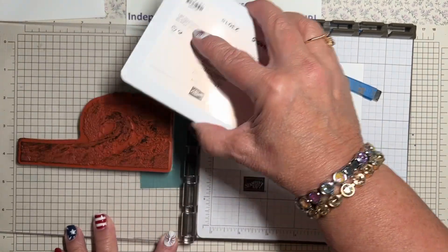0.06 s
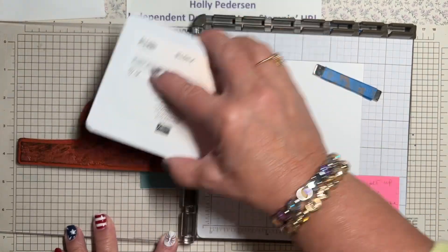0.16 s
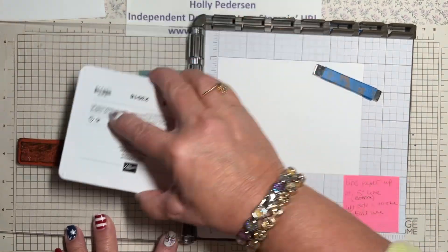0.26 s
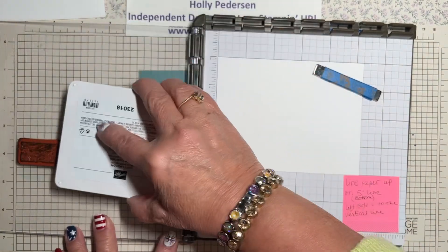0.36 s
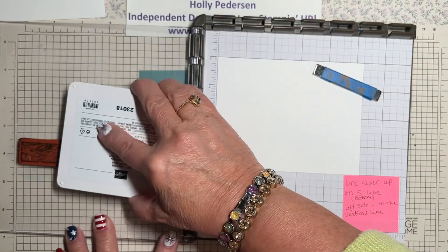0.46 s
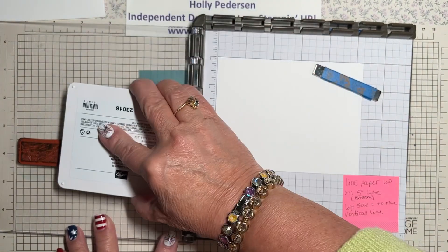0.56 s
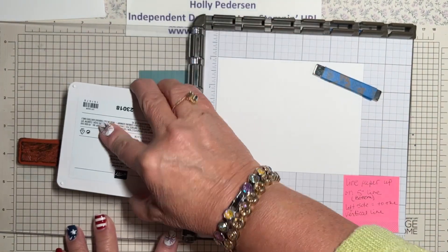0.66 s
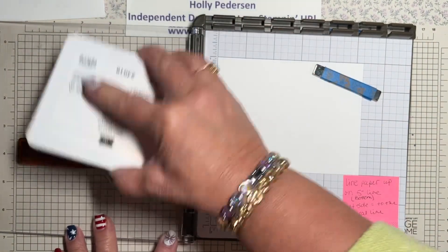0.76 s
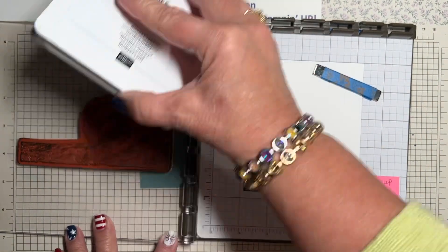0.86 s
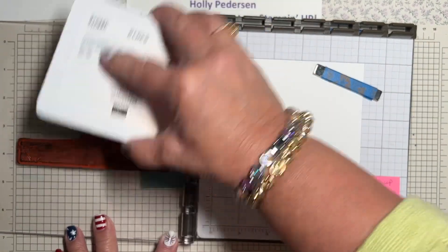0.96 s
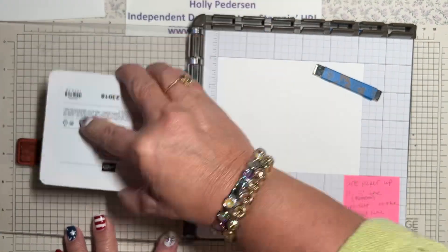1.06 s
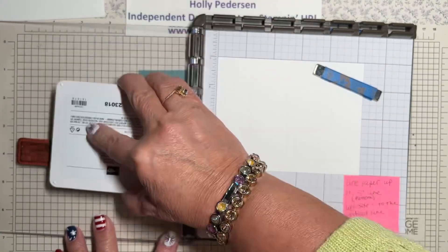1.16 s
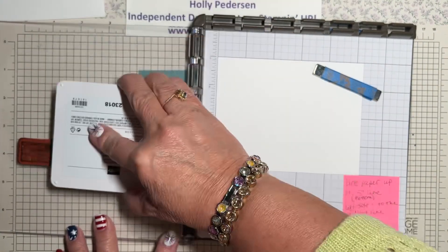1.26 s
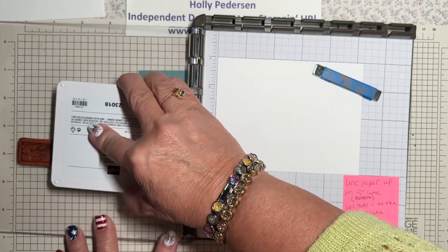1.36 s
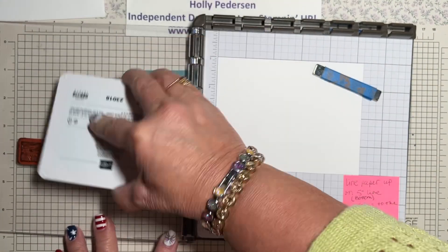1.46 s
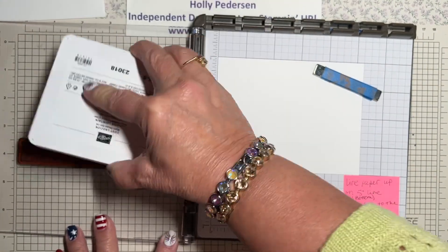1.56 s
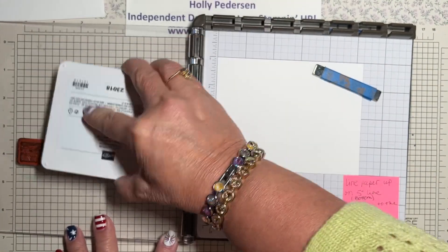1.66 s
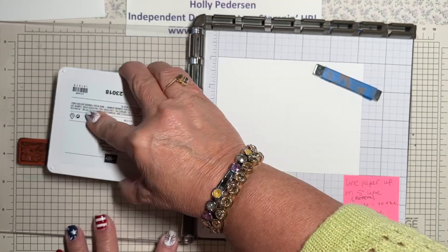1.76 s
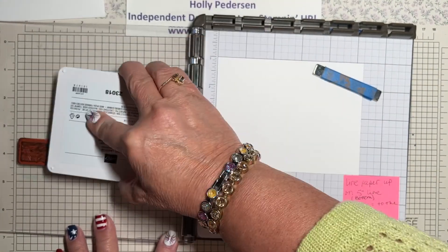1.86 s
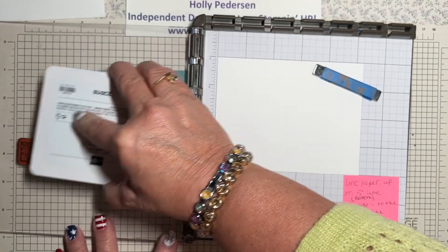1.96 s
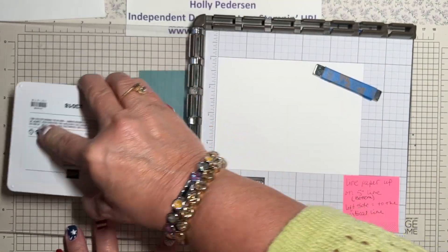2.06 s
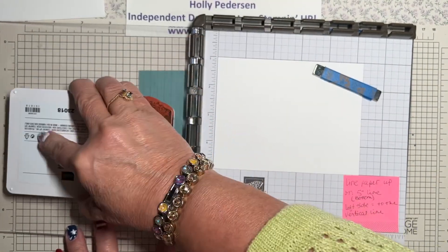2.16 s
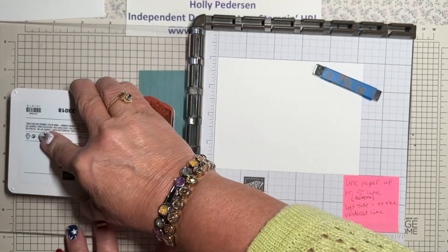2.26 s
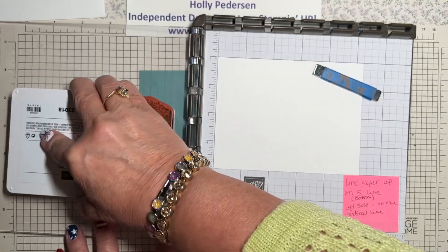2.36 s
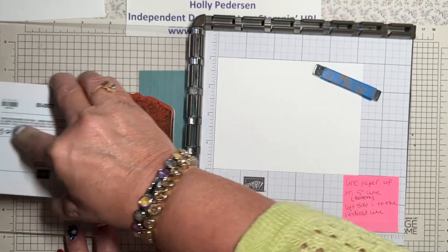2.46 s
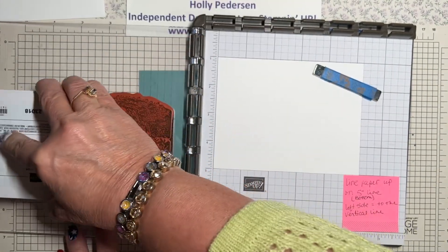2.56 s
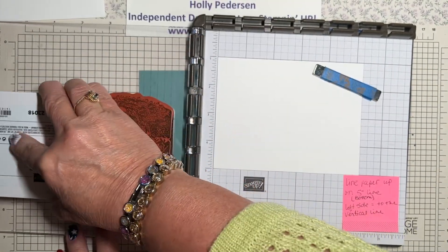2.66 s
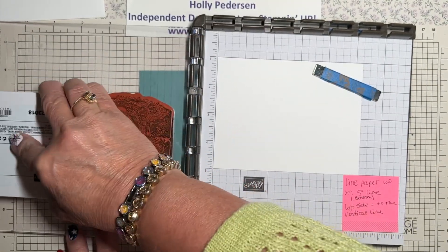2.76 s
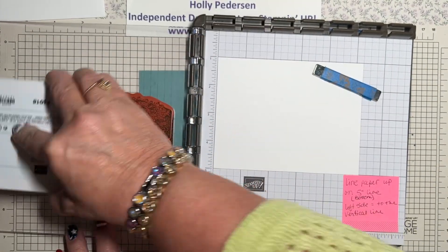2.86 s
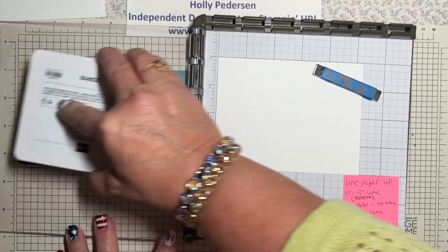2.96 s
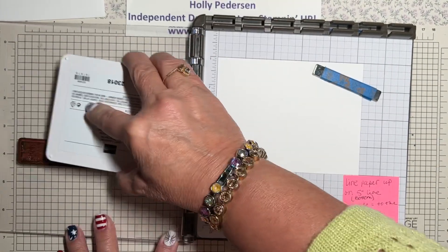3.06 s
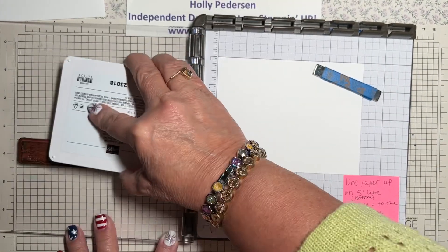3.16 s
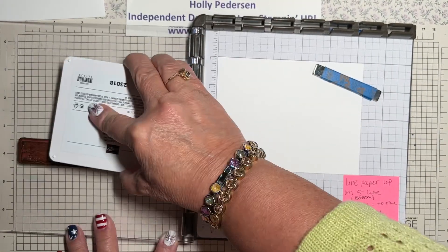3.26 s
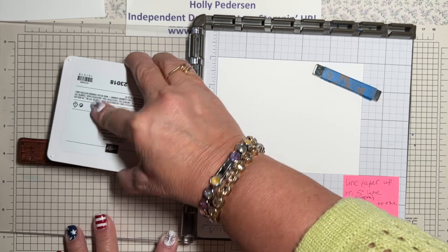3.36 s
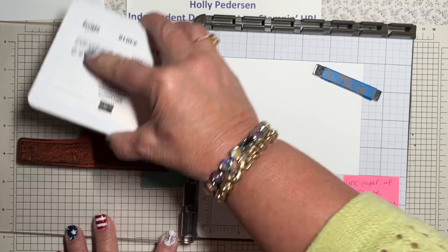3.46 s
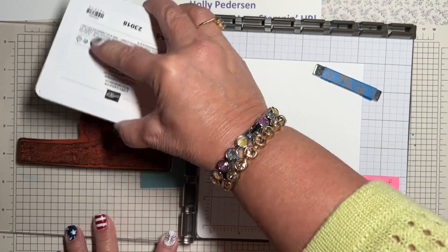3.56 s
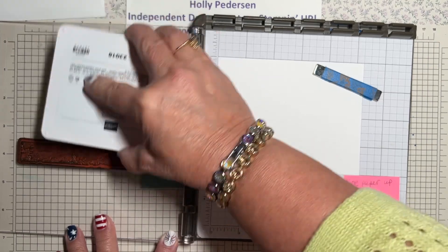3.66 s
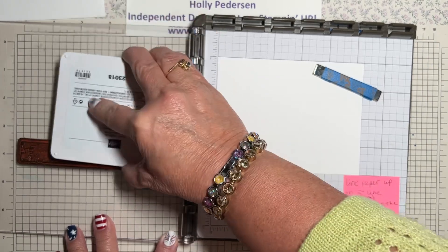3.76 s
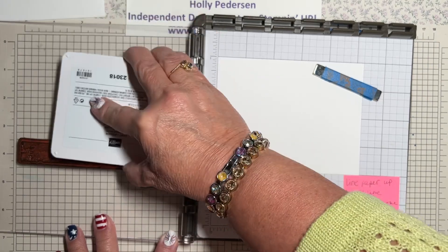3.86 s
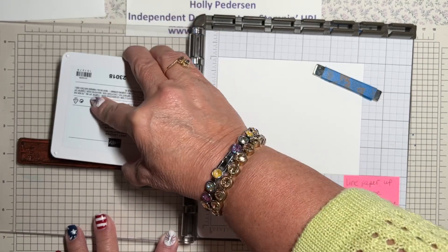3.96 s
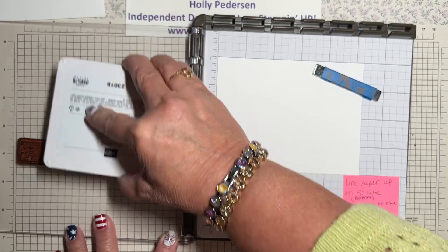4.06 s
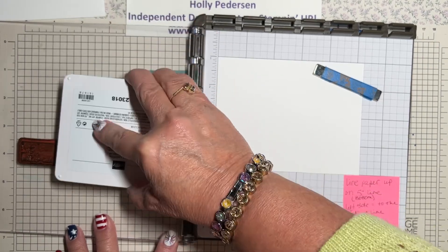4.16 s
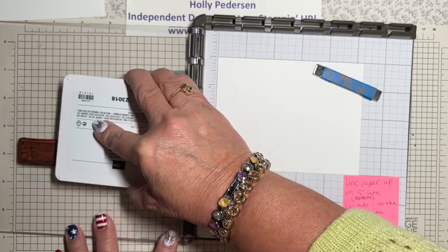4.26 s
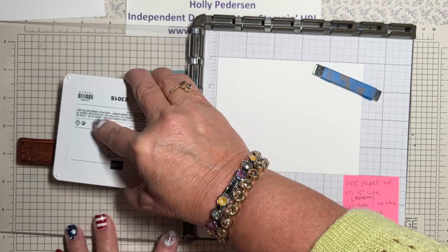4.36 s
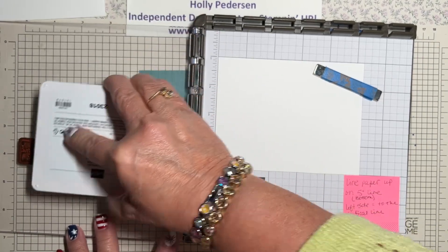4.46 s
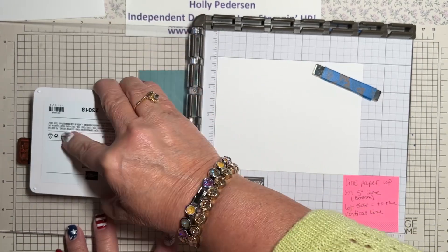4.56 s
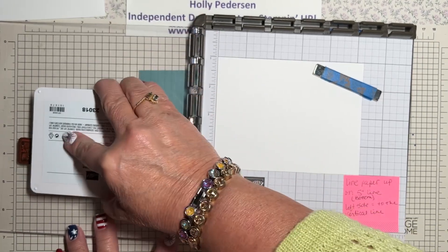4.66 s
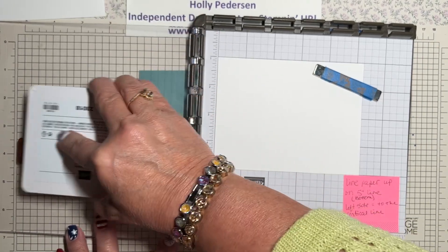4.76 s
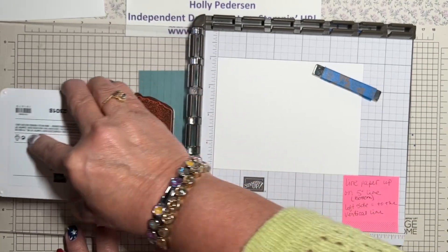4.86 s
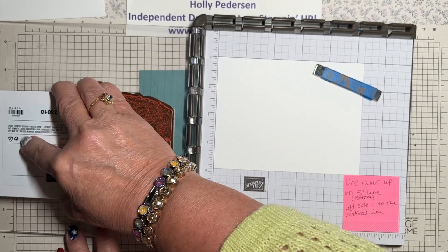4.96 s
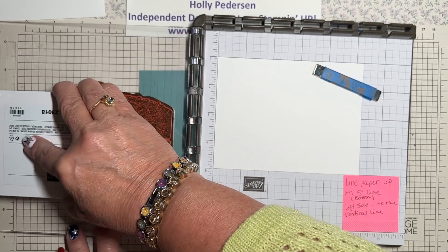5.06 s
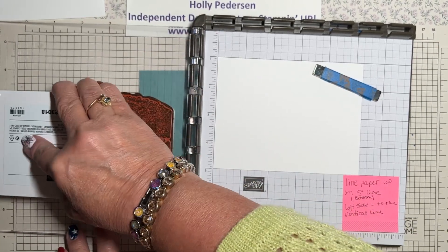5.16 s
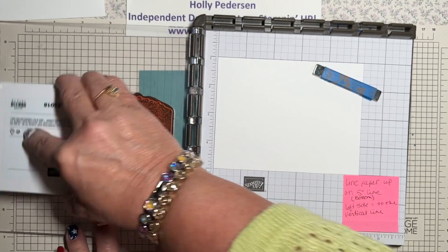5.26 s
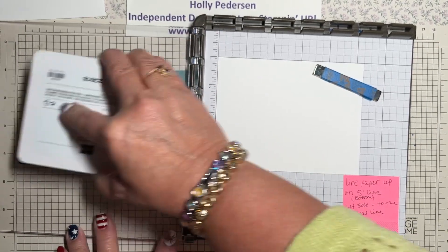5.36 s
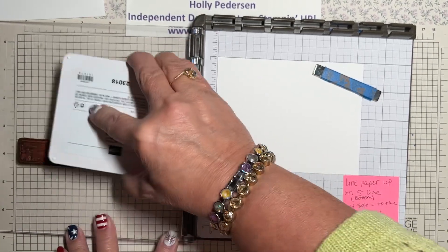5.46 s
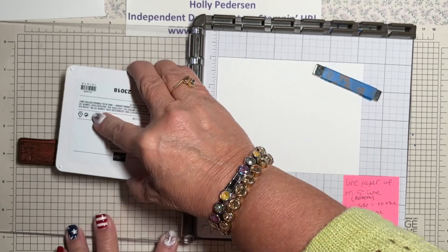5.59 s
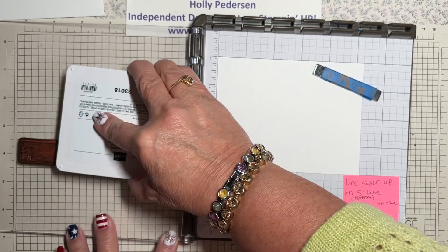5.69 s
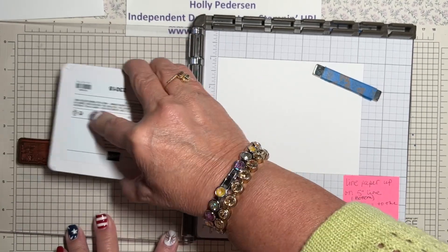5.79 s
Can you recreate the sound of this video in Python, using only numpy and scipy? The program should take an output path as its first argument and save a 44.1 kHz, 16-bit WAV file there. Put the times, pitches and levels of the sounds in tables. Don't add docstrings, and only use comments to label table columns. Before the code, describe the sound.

After a short quiet start with only faint hiss and low hand rumble, a light hollow plastic case lands on tacky rubber, rocks in a quick flutter, then lifts. More taps follow at irregular intervals, some firm and snappy, others dull and soft, with tiny crisp clicks and short tacky tears between. Dry small room with short reflections, recorded close in stereo.

```python
import sys
import numpy as np
from scipy import signal
from scipy.fft import rfft, irfft, next_fast_len
from scipy.io import wavfile
from scipy.ndimage import uniform_filter1d

SR = 44100
rng = np.random.default_rng(int(sys.argv[2]) if len(sys.argv) > 2 else 0)


def makeup_ratio(level_db):
    decades = np.asarray(level_db, float) / 20
    return 10 ** decades


def output_pcm(signal):
    pcm = np.clip(np.atleast_2d(signal).T, -1, 1) * 32767
    wavfile.write(sys.argv[1], SR, np.round(pcm).astype(np.int16))


N = 257014
PADDED = next_fast_len(N)

# frequency in Hz, density in dB per Hz.
FLOOR_SPECTRUM = [(12, -49.5), (20, -14.5), (60, 4), (121, -3), (195, -12), (690, -25), (816, -27),
                  (1140, -29.5), (7950, -42), (10200, -48.5), (11800, -34), (13200, -35.5), (16500, -64)]
# frequency in Hz, correlation from 0 to 1.
FLOOR_LIKENESS = [(60, 0.96), (180, 0.76), (550, 0.47), (1650, 0.21), (4970, 0.27), (15000, 0.2)]
# frequency in Hz, rms level in dB.
HUM = [(120, -75)]
# time of the deepest press in seconds, level in dB.
PRESSES = [(0.098, -49.5), (0.41, -49), (0.52, -64), (0.7, -54.5), (0.9, -61), (1.15, -46.5), (1.46, -53),
           (1.7, -55), (1.861, -58.5), (2.18, -45), (2.29, -60), (2.45, -58), (2.63, -42.5), (2.89, -54.5),
           (3.16, -62.5), (3.3, -56.5), (3.449, -58), (3.88, -68.5), (4.09, -55), (4.2, -65.5), (4.42, -54),
           (4.56, -43.5), (4.75, -56), (4.98, -52), (5.282, -49), (5.58, -69), (5.7, -56)]
# frequency in Hz, density in dB per Hz.
RUMBLE = [(12, -35), (20, -6.5), (37, -10), (54, 0), (102, -10), (110, -18), (140, -62.5), (240, -120)]
# start in seconds, peak in dB, tilt in dB per octave,
# length in seconds.
TICKS = [(.3253, -60, 9, 0.0033), (0.8705, -52, 6, 0.00446), (0.8808, -39.5, 5.5, 0.0057),
         (0.8967, -44, 0.5, 0.012), (.9413, -50, 5.5, 0.0091), (0.966, -40, 11, 0.0031),
         (0.977, -52.5, 0, 0.0055), (0.995, -61, -2, 0.0031), (1.013, -45.5, 5.5, 0.0067),
         (1.111, -52.5, -2.5, 0.0078), (1.194, -45.5, 10.5, 0.00079), (1.588, -59.5, -3.5, 0.0093),
         (1.665, -46.5, 0.5, 0.0047), (2.024, -50, 7, 0.003), (2.488, -50, 5, 0.0012),
         (2.591, -47, 3.5, 0.0044), (3.201, -49, 1.5, 0.0027), (3.555, -60, 0.5, 0.0036),
         (3.569, -56, 7, 0.0063), (3.6075, -53.5, 1.5, 0.0016), (4.143, -36, 10, 0.0016),
         (4.332, -56, -10, .002), (4.6446, -48.5, 3.5, 0.0061), (4.845, -48, 9.5, 0.0019),
         (5.084, -58, -2.5, 0.003), (5.46, -57.5, 1, .003), (5.6444, -54, 0.5, 0.012),
         (5.651, -47, -17, 0.0017), (5.709, -50, 2, 0.0036)]
# frequency in Hz, density in dB per Hz.
TICK_SPECTRUM = [(880, -73), (1500, -42), (2940, -12.5), (6890, -14.5), (8510, -12), (9890, 1),
                 (12500, -5.5), (15100, -10.5), (16500, -30)]
# start in seconds, blow in dB, crack in dB re blow,
# favoured pad pitch in Hz, upper pad modes in dB.
TAPS = [(0.381, -27, -20, 780, -5.5), (1.136, -18, -18.5, 730, -20), (1.692, -35.5, -24.5, 920, -2),
        (2.153, -19, -27, 834, -5.5), (2.602, -26.5, -21.5, 964, -4.5), (3.093, -21, -12, 960, -4),
        (3.755, -18, -11.5, 891, -5), (4.021, -28.5, -18.5, 923, -1), (4.131, -19, -11.5, 794, -1.5),
        (4.535, -22.5, -16, 1054, -5), (4.956, -33, -22.5, 777, -3.5), (5.253, -24.5, -16, 935, -1.5),
        (5.539, -23.5, -13, 850, -4)]
# start in seconds, blow in dB, crack in dB re blow,
# favoured pad pitch in Hz, upper pad modes in dB.
BOUNCES = [
    (0.4385, -19.5, -44, 910, -6),
    (0.4495, -20, -39, 1100, -3.5),
    (0.48, -29.5, -50, 940, -13.5),
    (0.518, -20, -64, 755, -3.5),
    (1.142, -19, -16, 834, 2.5),
    (1.286, -33.5, -51.5, 630, -2),
    (2.5975, -32, -47, 1010, -8),
    (3.256, -35, -60, 592, -6),
]
# start in seconds, blow in dB,
# crack in dB re blow, favoured pad pitch in Hz, upper pad modes in dB.
DROPS = [(0.401, -34, -28, 985, -7), (0.688, -44, -17, 800, -18), (1.434, -43, -17.5, 759, -11),
         (1.917, -46, -32, 646, -2), (2.827, -41, -21, 847, -1.5), (2.851, -35.5, -31, 922, -6),
         (4.366, -40.5, -41, 730, -7.5), (4.4, -44.5, -35, 970, 2.5), (4.74, -52.5, -32.5, 720, 0.5),
         (5.287, -34.5, -18.5, 990, -2.5), (5.771, -45.5, -23.5, 794, -11)]
# frequency in Hz, density in dB per Hz.
CRACK_SPECTRUM = [(1290, -26.5), (2200, 0), (3470, -5), (4780, -2), (8130, -7), (10100, 7), (11600, -3),
                  (12200, -9), (14200, -10), (16500, -25.5)]
# frequency in Hz, level in dB, t60 in seconds.
PAD = [(516, 4.5, 0.011), (630, -9.5, 0.011), (739.4, 4, 0.025), (834, 5, 0.023), (927.7, 6, 0.027),
       (978, 1.5, 0.02), (1018, -8, 0.069)]
# frequency in Hz, level in dB, t60 in seconds.
PAD_UPPER = [(1293, 15.5, 0.0092), (1406, 3.5, 0.027), (1304, -19, 0.15), (1730, -6.5, 0.026),
             (2060, -10.5, 0.043), (2450, -16, 0.026), (2840, -8.5, 0.012)]
# frequency in Hz, level in dB, t60 in seconds.
DESK = [(68.8, -13, 0.15), (80, -8, 0.15), (127, -10.5, 0.063), (133.6, 3.5, 0.076), (135.8, -6.5, 0.13),
        (151, -4, 0.059), (249.1, -7.5, 0.15), (312.2, -4.5, 0.14), (338.4, 1, 0.039), (361.4, -1.5, 0.061),
        (421.7, -9, 0.08)]
# frequency in Hz, density in dB per Hz.
SCATTER_SPECTRUM = [(290, -30.5), (500, 5), (885, -6), (1660, -16.5), (5750, -20.5), (8300, -28.5),
                    (10300, -43.5), (12900, -27.5), (14700, -34.5), (16500, -67.5)]
# frequency in Hz, t60 in seconds.
SCATTER_T60 = [(500, 0.13), (1500, .25), (4000, 0.23), (8000, 0.26), (11000, 0.34), (15000, .12)]
# delay in seconds, level in dB.
EARLY = [
    (.0036, -13.5),
    (.0066, -24.5),
    (.0092, -15.5),
    (.0128, -18),
    (.021, -18),
]
# frequency in Hz, left over right in dB.
PORT_LEAN = [(60, 1.0), (110, 1.5), (200, 1.5), (380, 3.0), (700, 3.5), (1290, 3.0), (2380, 5.0),
             (4400, 6.0), (8120, 1.5), (15000, 0.0)]
# frequency in Hz, left ahead of right in radians.
PORT_LEAD = [(0, 0), (1810, 0.4), (3450, 1.1), (5770, 0.0), (6980, 0.1), (8440, -1.1), (9040, -2.6),
             (11000, -3.6), (12500, -5.9), (14400, -6.6), (15700, -9.0), (16400, -8.3)]
# frequency in Hz, t60 in seconds.
ROOM_T60 = [(100, 1), (300, 0.23), (800, .3), (2000, 0.31), (5000, 0.095), (12000, 0.89)]
# frequency in Hz, level in dB re direct.
ROOM_LEVEL = [(100, -11.5), (400, -8.5), (1000, -18), (3000, -8), (7000, -10.5), (14000, -19)]
# first tearing in seconds, time to the climax in seconds, climax in dB,
# shaken pad in dB re tearing.
PEELS = [(0.658, 0.03, -57, 8), (0.878, .03, -70, -22.5), (1.402, 0.046, -55, 5), (1.888, .03, -58, 7),
         (2.356, 0.035, -55.5, 6), (2.791, .035, -55.5, 5), (3.352, 0.03, -55.5, 3.5),
         (3.968, 0.041, -57.5, 11), (4.335, 0.033, -57, 7.5), (4.722, 0.02, -60, 7),
         (5.185, 0.062, -57, 9.5), (5.742, 0.032, -56, 7)]
# frequency in Hz, density in dB per Hz.
TEAR_SPECTRUM = [(410, -22), (700, -30), (1450, -54), (1860, -4.5), (7370, -16.5), (10100, -13),
                 (11500, -10), (13900, -13), (15900, -25), (16500, -52.5)]


def evened(x):
    return x / np.sqrt(np.mean(x ** 2) + 1e-20)


def peaked(x):
    return x / abs(x).max()


def read(points, hz):
    f, value = np.transpose(points)
    return np.interp(np.log(hz + 1), np.log(f + 1), value)


def add(mix, s, sound):
    part = mix[..., round(s * SR):][..., :sound.shape[-1]]
    part += sound[..., :part.shape[-1]]


def colour(x, points, tilt_db=0):
    size = next_fast_len(x.shape[-1])
    hz = np.fft.rfftfreq(size, 1 / SR)
    gain = makeup_ratio(read(points, hz) + tilt_db * np.log2((hz + 99) / 8000))
    return irfft(rfft(x, size) * gain, size)[..., :x.shape[-1]]


def floor():
    hz = np.fft.rfftfreq(PADDED, 1 / SR)
    left, other = rfft(rng.standard_normal((2, PADDED)))
    same = np.clip(read(FLOOR_LIKENESS, hz), -1, 1)
    right = same * left + np.sqrt(1 - same ** 2) * other
    air = irfft(np.array([left, right]) * makeup_ratio(read(FLOOR_SPECTRUM, hz)), PADDED)[:, :N]
    t = np.arange(N) / SR
    hum = sum(np.sqrt(2) * makeup_ratio(db) * np.sin(2 * np.pi * f * t) for f, db in HUM)
    return makeup_ratio(-67.5) * evened(air) + hum


def handling():
    press_db_per_s, ease_db_per_s = 356, 193
    rock = evened(colour(rng.standard_normal(N), RUMBLE))
    t = np.arange(0, N + 64, 64) / SR
    weight = np.zeros(len(t))
    for s, db in PRESSES:
        weight += makeup_ratio(db - np.maximum(press_db_per_s * (s - t), ease_db_per_s * (t - s)))
    return rock * np.interp(np.arange(N) / SR, t, weight)


def burst(points, length, tilt_db=0):
    t = np.arange(4096) / SR
    fall = np.exp(-t / length) + 0.17 * np.exp(-t / (6 * length))
    shape = fall * np.minimum(t / 0.0001, 1)
    snap = colour(rng.standard_normal(len(t)), points, tilt_db) * shape
    return 0.43 * shape.max() * snap * np.linalg.norm(shape) / np.linalg.norm(snap)


def tick(s, db, tilt_db, length):
    return s, makeup_ratio(db) * burst(TICK_SPECTRUM, length / 2, tilt_db)


def blows():
    rows = []
    for table, desk_db in ((TAPS, -12), (BOUNCES, -24), (DROPS, -12)):
        for s, blow_db, crack_db, hz, upper_db in table:
            give_db = 0.07 * (blow_db + 30)
            rows.append((s, blow_db, crack_db, desk_db - give_db, hz, upper_db))
    return sorted(rows)


def crack(s, blow_db, crack_db, *_):
    lead = 400
    out = np.zeros(SR // 8)
    swell = np.exp(np.arange(-lead, 0) / 120.0)
    squeeze = evened(colour(rng.standard_normal(lead), SCATTER_SPECTRUM)) * swell
    add(out, 0, makeup_ratio(blow_db - 30.5) * squeeze)
    add(out, lead / SR + 0.001, makeup_ratio(blow_db + crack_db + 18.0) * burst(CRACK_SPECTRUM, 0.001))
    return s - lead / SR, out


def ring(modes, rise, favoured_hz=None, step=2.0):
    hz, db, t60 = np.transpose(modes)[:, :, None]
    t = np.arange(SR // 2) / SR
    db = db + 1.5 * rng.standard_normal(db.shape)
    start = step * np.arange(len(hz))[:, None] + 0.4 * rng.standard_normal(db.shape)
    if favoured_hz:
        db = db - 14 * abs(np.log2(hz / favoured_hz))
    waves = makeup_ratio(db - 60 * t / t60) * np.sin(2 * np.pi * hz * t + start)
    return peaked(waves.sum(0) * (1 - np.exp(-t / rise)))


def body(s, blow_db, crack_db, desk_db, hz, upper_db):
    desk = ring(DESK[:7], 0.0087, step=0.44) + 0.74 * ring(DESK[7:], 0.0043, step=0.47)
    out = makeup_ratio(desk_db + 3.5) * desk
    pad = ring(PAD, 0.00028, hz, step=1.384) + makeup_ratio(upper_db) * ring(PAD_UPPER, 0.00025, step=1.97)
    held = max(-crack_db - 18.5, 0)
    t = np.arange(len(pad)) / SR
    onset = np.minimum(t / (1e-5 + 0.000057 * held), 1)
    add(out, 0.0008, makeup_ratio(-3.0 - 41 * held * t) * onset * pad)
    return s, makeup_ratio(blow_db) * out


def scatter(s, blow_db, crack_db, *_):
    hz, t = np.fft.rfftfreq(256, 1 / SR)[:, None], np.arange(280) * 64 / SR
    a, b = rng.standard_normal((2, 2, len(hz), len(t)))
    lean_db = 0.49 * read(PORT_LEAN, hz) * np.array([1, -1])[:, None, None]
    fall_db = 60 * t / read(SCATTER_T60, hz)
    z = (a + 1j * b) * makeup_ratio(read(SCATTER_SPECTRUM, hz) + lean_db - fall_db)
    out = signal.istft(z, nperseg=256, noverlap=192)[1]
    out *= (1 - np.exp(-np.arange(out.shape[1]) / 150.0)) / np.std(out[:, :800])
    return s, makeup_ratio(blow_db + 0.62 * crack_db - 10.0) * out


def ports(x):
    hz = np.fft.rfftfreq(PADDED, 1 / SR)
    half = makeup_ratio(0.78 * read(PORT_LEAN, hz)) * np.exp(0.5j * read(PORT_LEAD, hz))
    return irfft(rfft(x, PADDED) * np.array([half, 1 / half]), PADDED)[:, :N]


def room(x):
    taps = np.zeros((2, SR // 2))
    at = np.arange(200, SR // 2 - 20, 20) + rng.integers(0, 20, (2, (SR // 2 - 201) // 20))
    np.put_along_axis(taps, at, rng.choice([-1.0, 1.0], at.shape), 1)
    hz, t, z = signal.stft(taps, SR, nperseg=256)
    fall = makeup_ratio(-60 * t / read(ROOM_T60, hz)[:, None])
    fall *= makeup_ratio(read(ROOM_LEVEL, hz))[:, None] / np.linalg.norm(fall, axis=1, keepdims=True)
    tail = signal.istft(z * fall, SR, nperseg=256)[1] * 0.5
    shared, own = signal.fftconvolve(x[None], tail, axes=1)[:, :N]
    opposed = colour(own, [(150, -17.5), (500, -3)]) * np.array([[1], [-1]])
    return ports(shared) + 1.2 * opposed


def peel(s, climb, climax_db, shake_db):
    start_db, fall_db_per_s, grip_s, span_s = -18.5, 700, 0.014, 0.14
    shake_start_db, shake_gain_db_per_s = -5, 295
    t = np.arange(SR // 6) / SR
    snaps = rng.standard_normal((2, len(t))) * makeup_ratio(0.73 * rng.exponential(1, (2, len(t))))
    clumps = makeup_ratio(2.6 * evened(uniform_filter1d(rng.standard_normal(len(t)), 130)))
    case = ring(PAD, 0.00025) + 0.4 * ring(DESK[4:], 0.0037) + 0.36 * ring(PAD_UPPER, 0.00023)
    shaken = signal.fftconvolve(snaps[1], case)[:len(t)]
    to_go, after = np.maximum(1 - t / climb, 0), np.maximum(t - climb, 0)
    shake = makeup_ratio(shake_db + shake_start_db * to_go + shake_gain_db_per_s * after - 1.0)
    both = evened(colour(snaps[0], TEAR_SPECTRUM)) + shake * evened(shaken)
    edges = np.clip(np.minimum(t, span_s - t) / grip_s, 0, 1)
    swell = makeup_ratio(climax_db + start_db * to_go - fall_db_per_s * after - 4.5)
    return s, both * clumps * edges * swell


def scene():
    (rings, slaps, small, echoes), around = np.zeros((4, N)), np.zeros((2, N))
    for mix, source, rows in ((small, tick, TICKS), (slaps, crack, blows()), (rings, body, blows()),
                              (around, scatter, blows()), (small, peel, PEELS)):
        for row in rows:
            add(mix, *source(*row))
    for k, (s, db) in enumerate(EARLY):
        add(echoes, s, (-1) ** k * makeup_ratio(db) * rings)
    wet = room(rings + makeup_ratio(-1.5) * small)
    return ports(rings + echoes + slaps + small + handling()) + around + wet + floor()


def top_cut(x):
    return signal.sosfilt(signal.butter(12, 16830, fs=SR, output="sos"), x)


def record(dry):
    hz = np.fft.rfftfreq(PADDED, 1 / SR)
    notch_db = -17 * np.exp(-((hz - 10150) / 750) ** 2)
    edge = 1 / (1 + (hz / 16500) ** 100) / (1 + (42 / (hz + 1)) ** 3)
    heard = irfft(rfft(dry, PADDED) * makeup_ratio(notch_db) * edge, PADDED)[:, :N]
    return top_cut(heard)


dry = scene()
out = record(dry)
output_pcm(out)
```